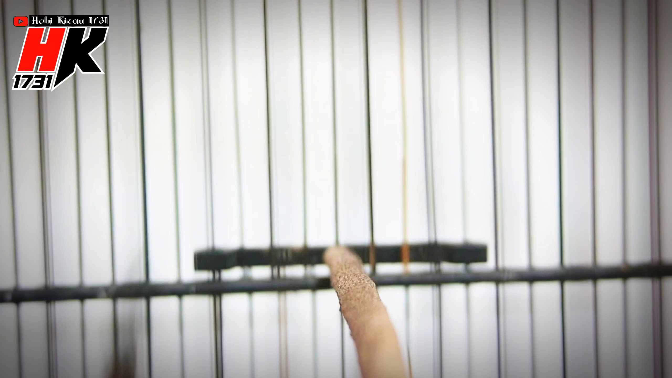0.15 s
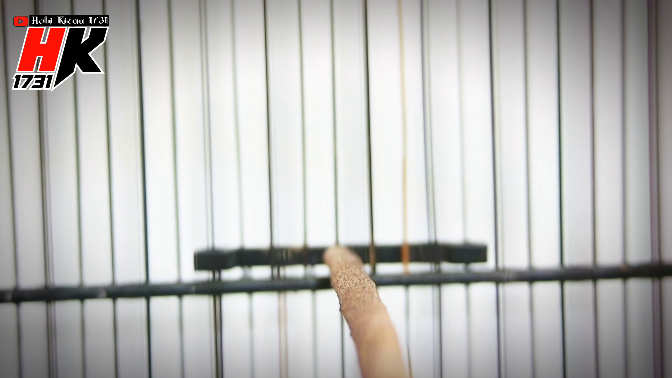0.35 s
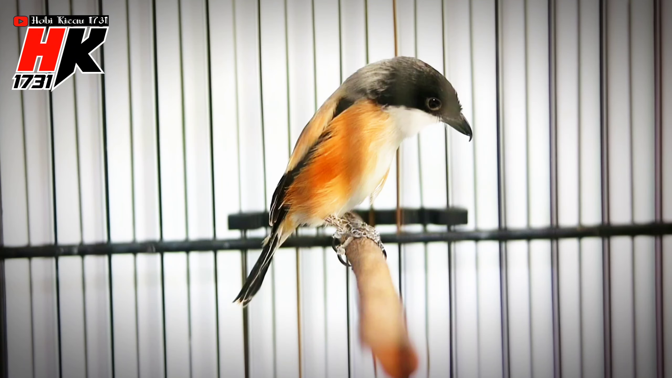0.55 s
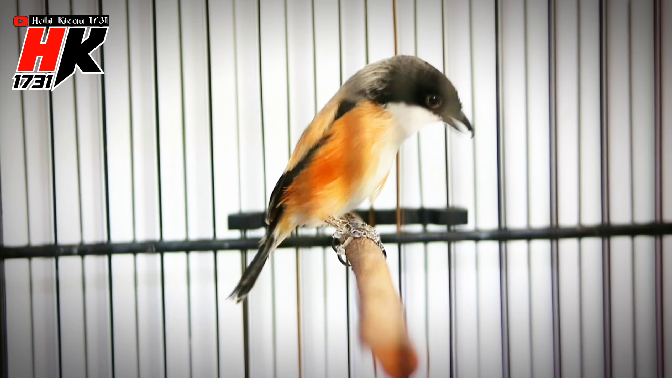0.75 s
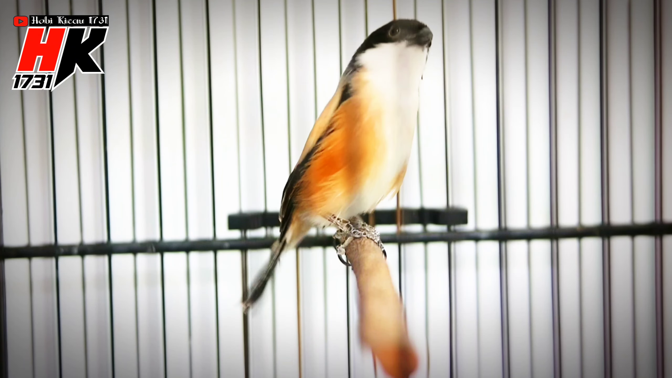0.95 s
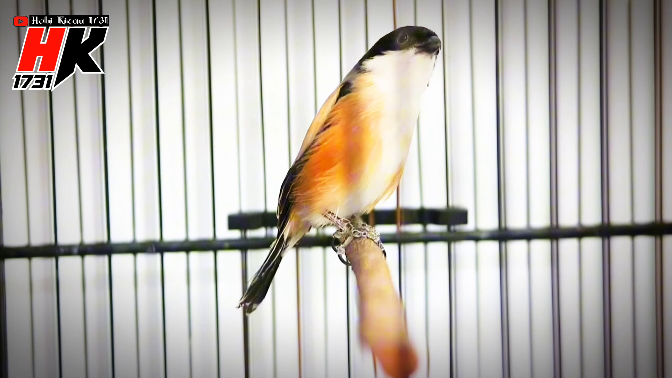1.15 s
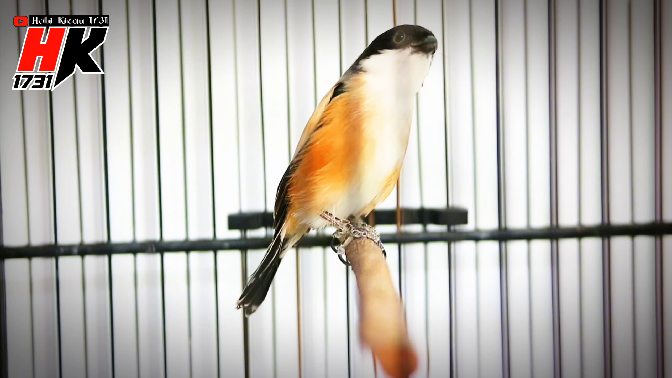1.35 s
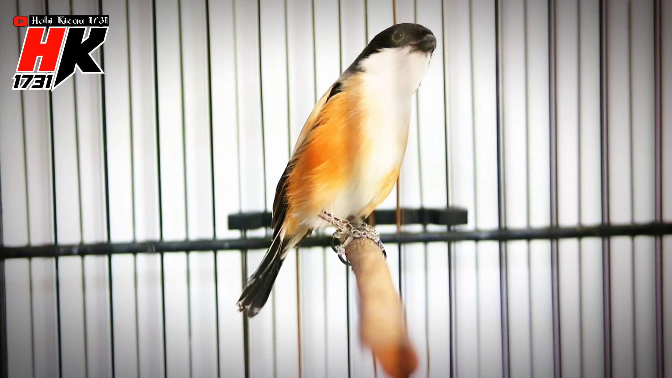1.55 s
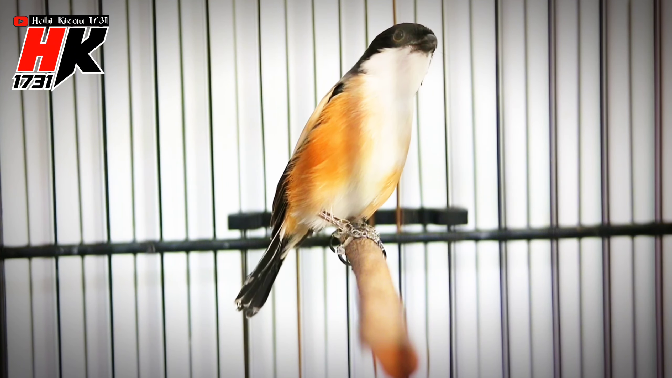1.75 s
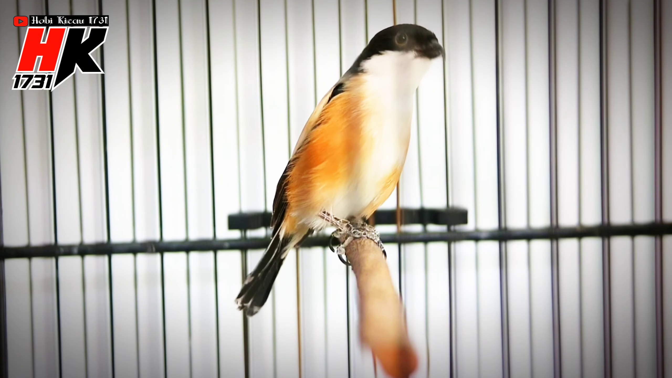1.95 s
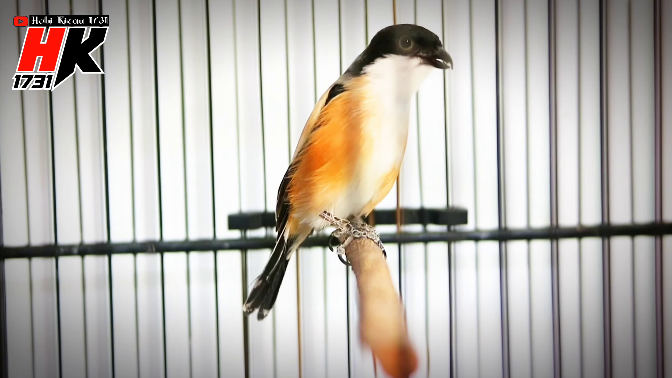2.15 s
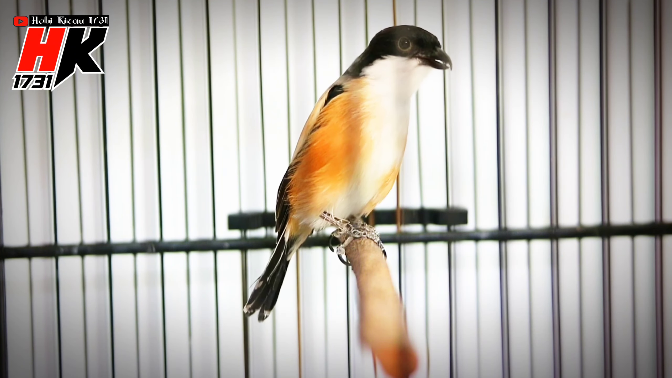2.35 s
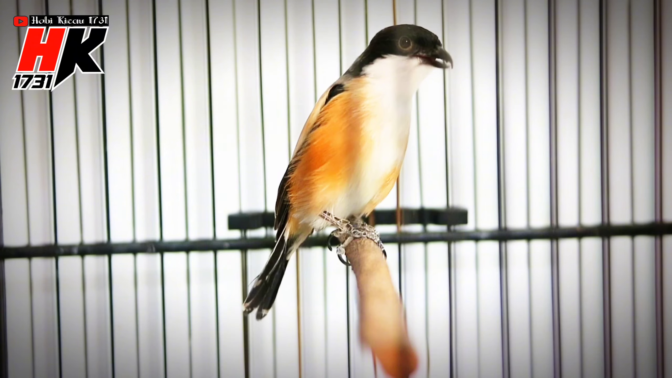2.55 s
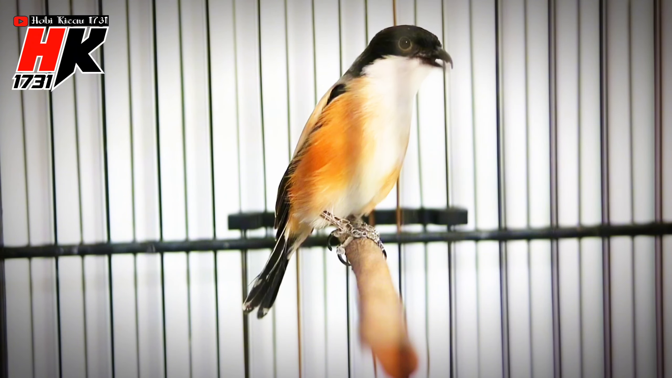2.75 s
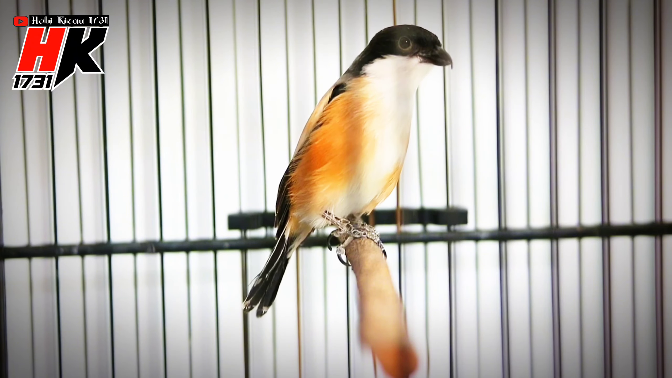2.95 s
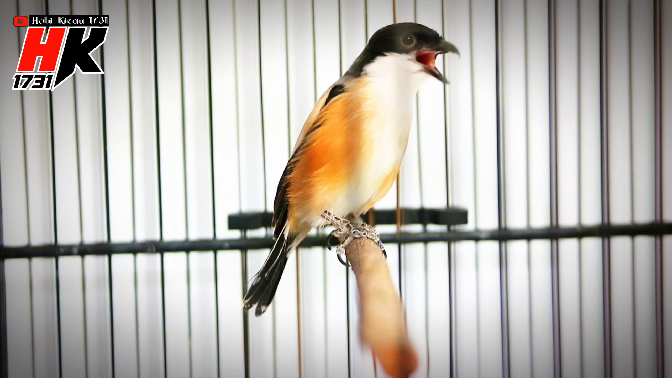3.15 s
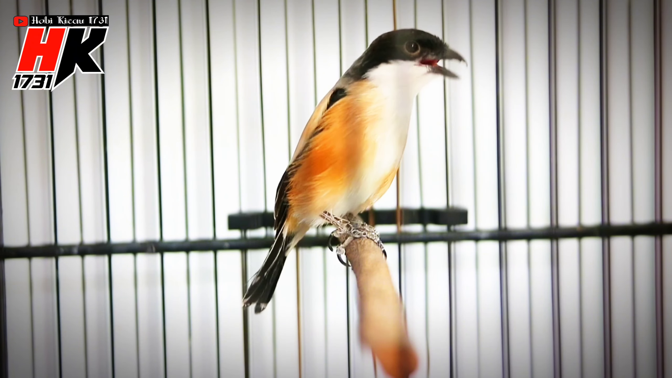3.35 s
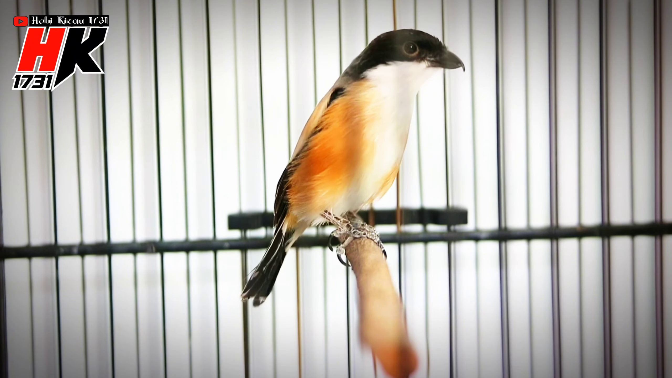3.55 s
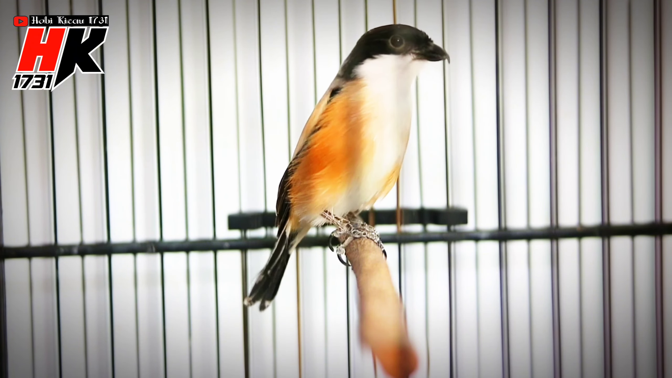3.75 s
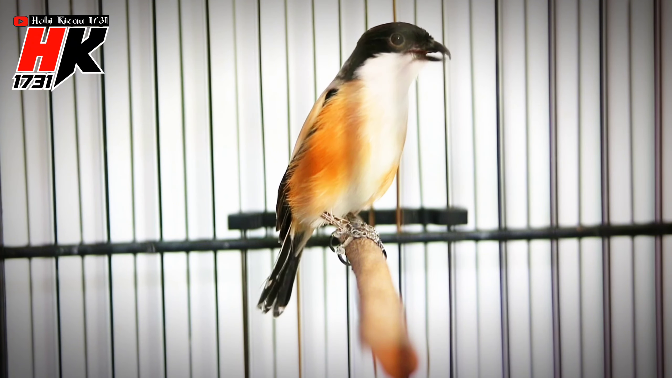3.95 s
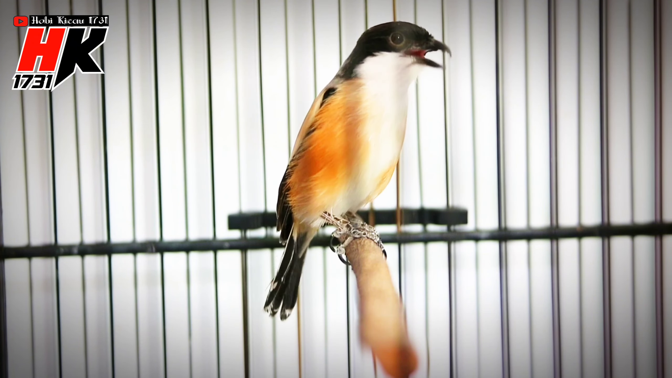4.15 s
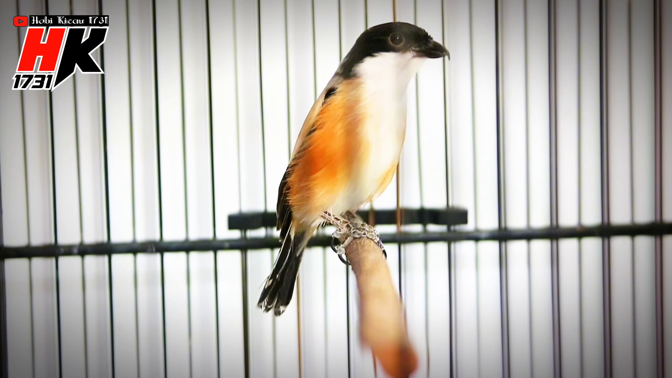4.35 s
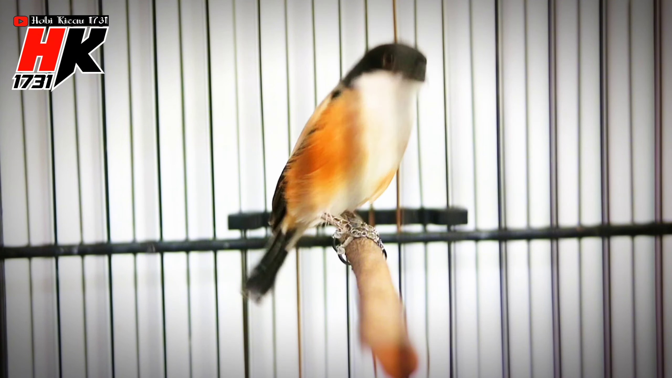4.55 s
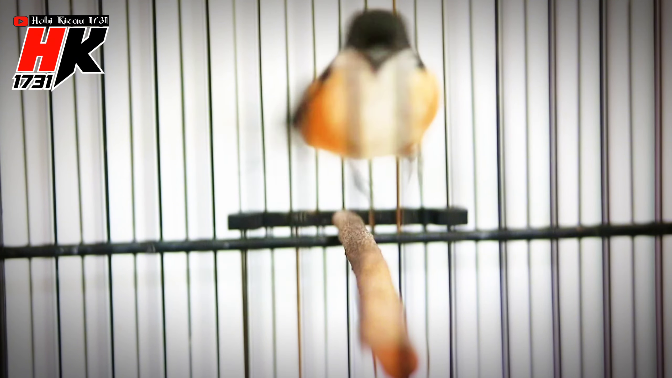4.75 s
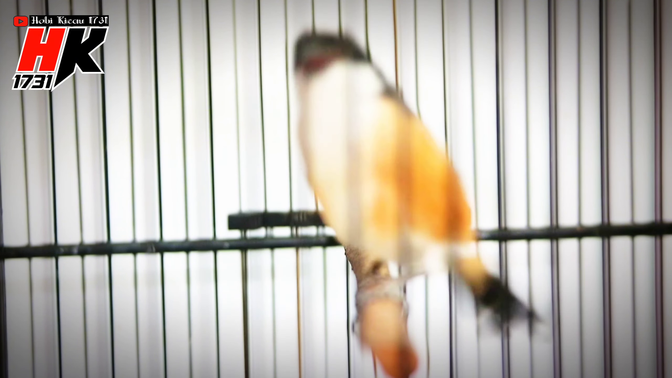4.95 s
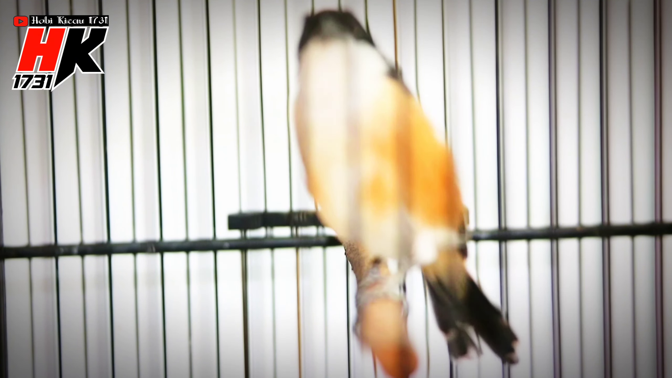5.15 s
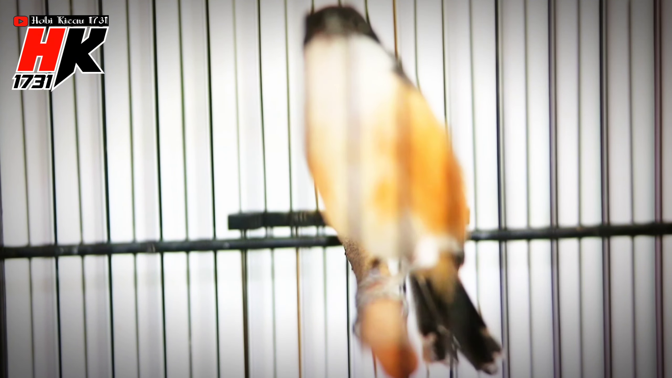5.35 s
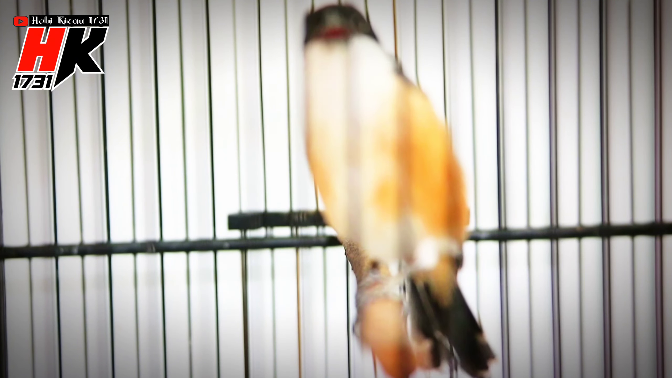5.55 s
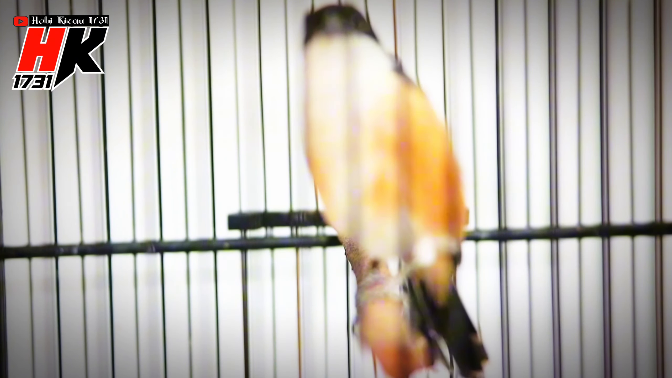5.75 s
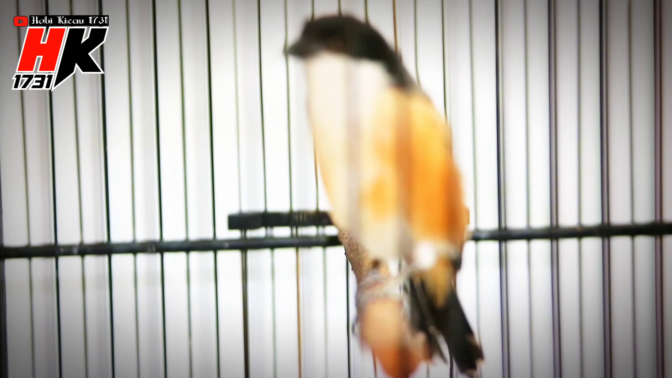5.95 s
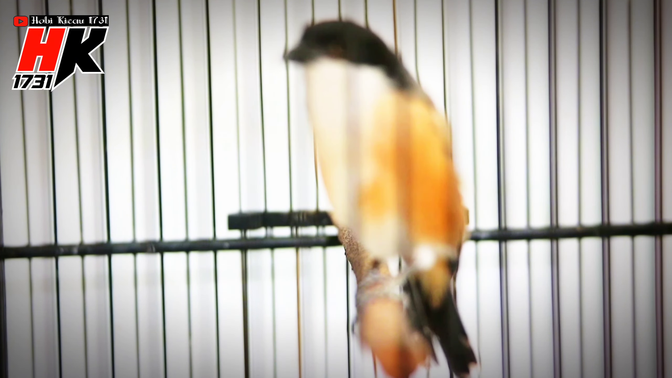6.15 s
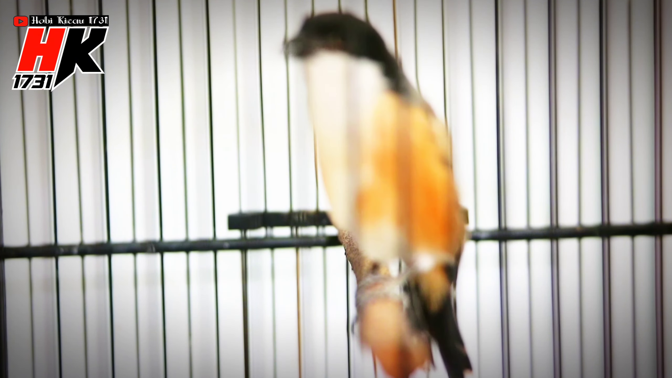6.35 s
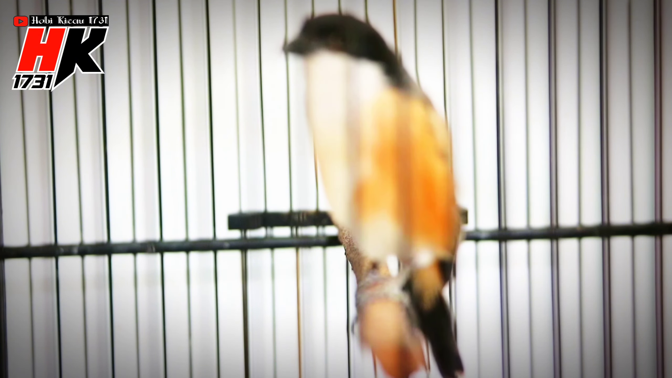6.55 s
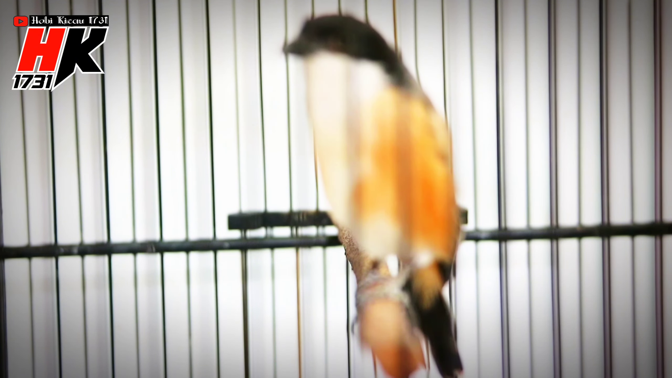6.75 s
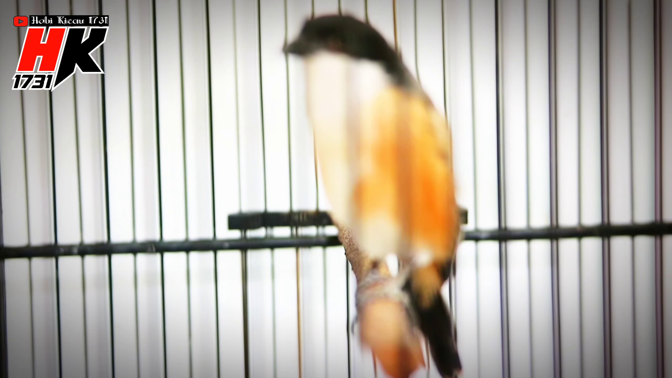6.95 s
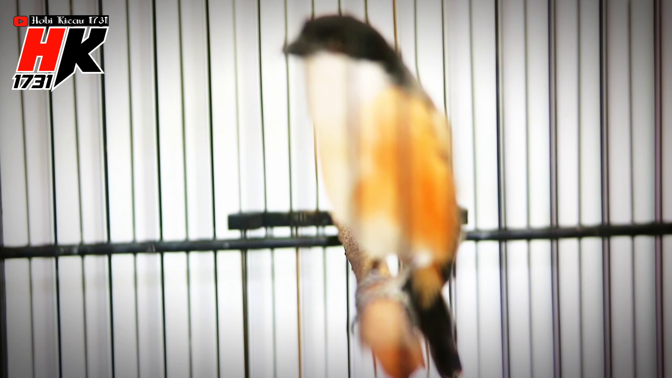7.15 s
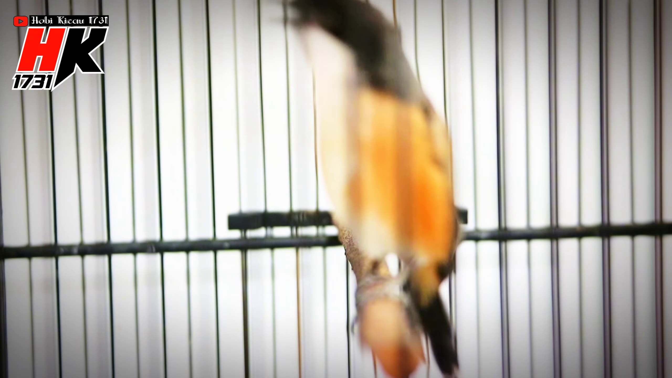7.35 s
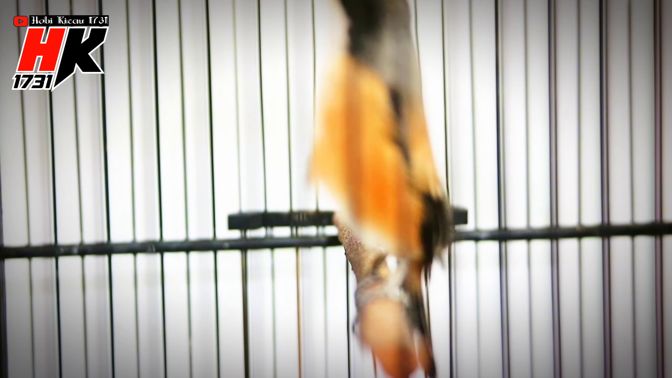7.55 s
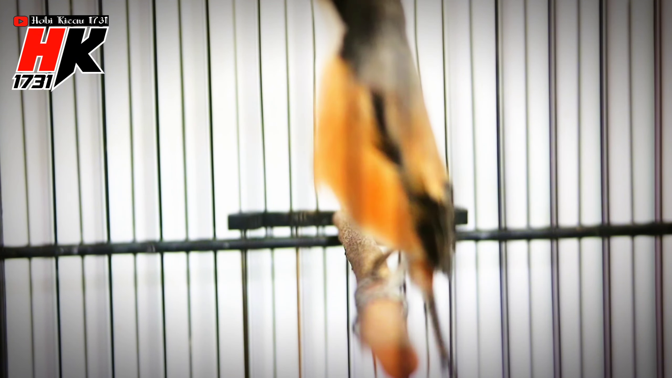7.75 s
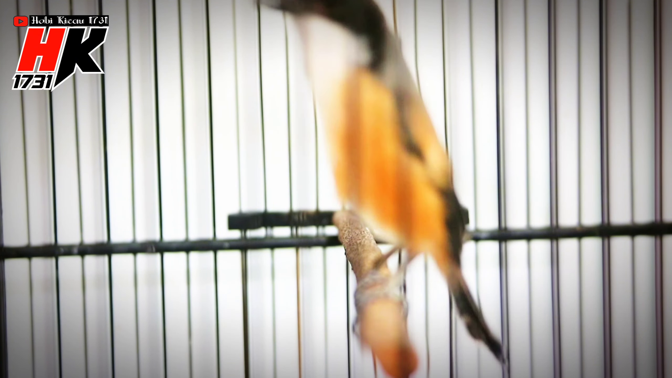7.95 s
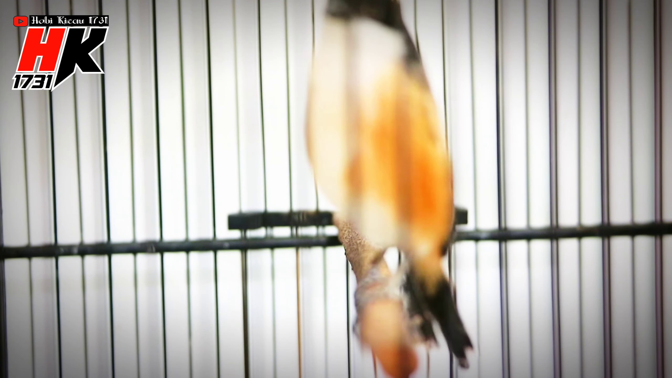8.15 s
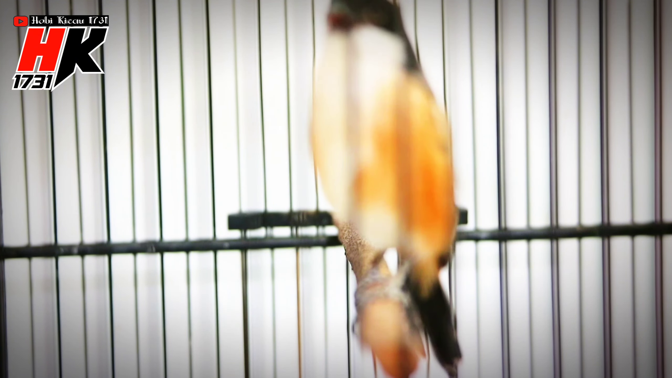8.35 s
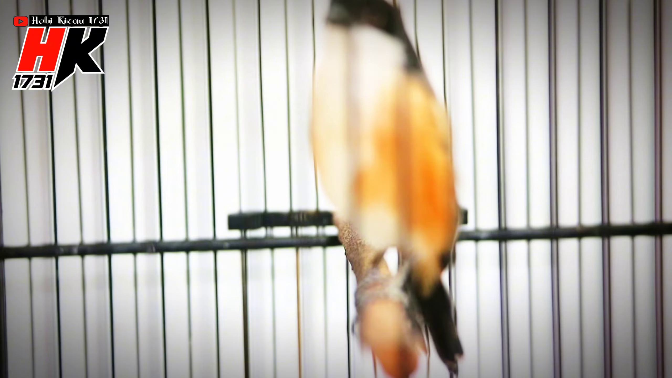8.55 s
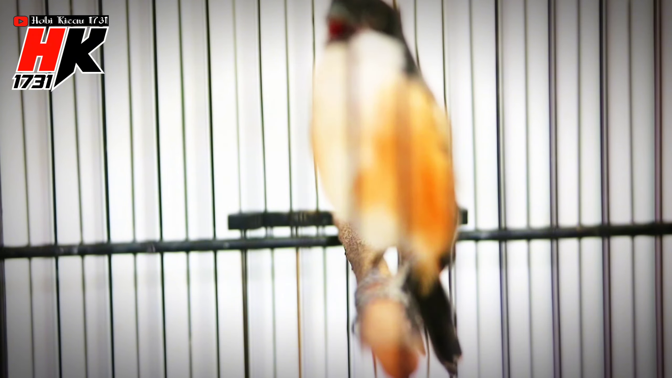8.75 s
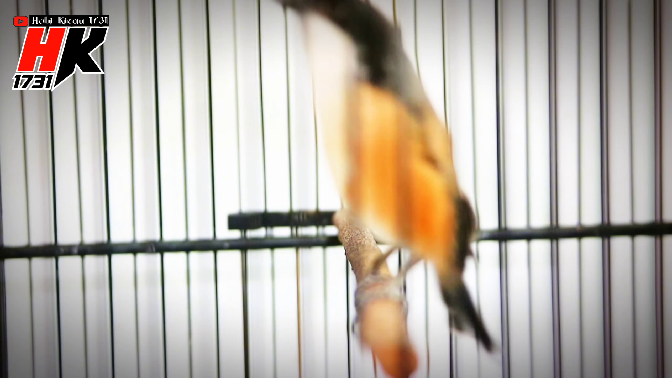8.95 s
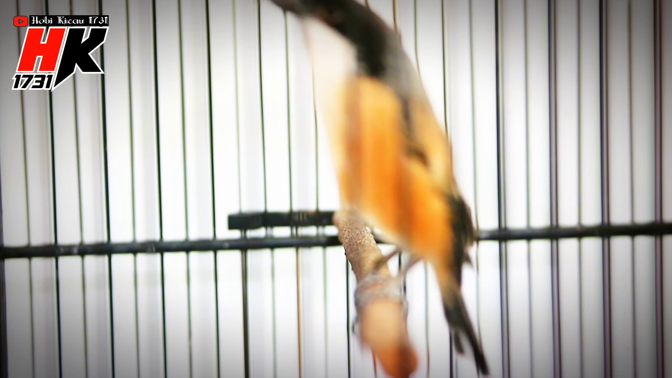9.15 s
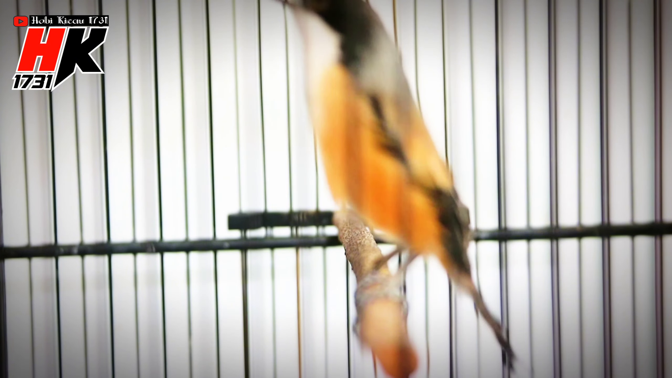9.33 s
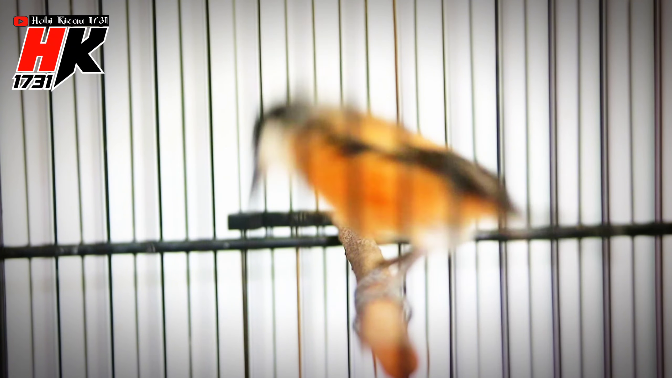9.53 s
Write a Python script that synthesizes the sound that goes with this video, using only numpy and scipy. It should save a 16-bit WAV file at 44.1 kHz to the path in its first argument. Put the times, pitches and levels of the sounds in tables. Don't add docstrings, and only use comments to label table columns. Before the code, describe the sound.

A shrike sings close to the microphones, slightly left, in a bare room with a bright half-second ring. At 0 s comes one short, slightly rough squeak. From about 0.46 to 0.85 s feathers rustle and wings slap bars and perch in four quick dry thumps. Loud clear chirps near 3.6 kHz begin at 0.84 s, about every 0.22 s, dropping to about 3.1 kHz from 1.7 to 2.9 s. A snarl at 3.15 s and two higher chirps follow; from 3.9 to 6.4 s harsh raspy chacks alternate with purer, lower chirps. In the pause, a faint distant call sounds at 6.8 s. From 7.3 s five long thin whistles leap up and sink gently, about two per second, with abrupt falling flicks and rough tails; the last, weaker whistle ends in scratchy notes, including a rising flick, around 9.6 s. Low fan hum ducks under calls and swells between them; peaks clip slightly.

```python
import sys
import numpy as np
from scipy import signal
from scipy.fft import rfft, irfft
from scipy.io import wavfile
from scipy.ndimage import uniform_filter1d, minimum_filter1d

SR = 44100
rng = np.random.default_rng(int(sys.argv[2]) if len(sys.argv) > 2 else 0)


def undo_db(level):
    steps = np.asarray(level, float) / 20
    return 10 ** steps


def inscribe(sig):
    pcm = np.round(np.clip(np.atleast_2d(sig).T, -1, 1) * 32767)
    wavfile.write(sys.argv[1], SR, pcm.astype(np.int16))


N = 427329


SQUEAK = [(0.004, .048, 3080, -4, -.06)]
SQUEAK_PARTIALS = [(1, -17), (2, -7.5), (3, -22.5), (4, -36)]
SQUEAK_BREAK = (0.37, 0.018, 0.3, 0.016, 0.52)
SQUEAK_BREATH = (0.029, 25, 4.3, 0.038, 9.8)


def squeak():
    notes = scooped(SQUEAK, SQUEAK_BREATH)
    return sing(notes, SQUEAK_PARTIALS, SQUEAK_BREAK, rasp_share=.05, breath=.002, droop=0.12)


# two near 3.7 kHz, two near 3.1 kHz
CHIRPS = [(.835, .078, 3714, -9.5, -0.0069), (1.052, 0.089, 3644, -10, -0.0013),
          (1.273, .082, 3714, -9, -0.082), (1.492, 0.075, 3512, -8, -0.055)]
HIGH_CHIRPS = [(3.428, .092, 3735, -9.5, -.035), (3.67, .11, 3761, -11, -0.084)]
LOW_CHIRPS = [(1.705, 0.1, 3249, -6.5, -0.06), (1.93, 0.089, 3119, -7.5, -0.028),
              (2.153, 0.082, 3118, -6.5, -.03), (2.375, 0.084, 3114, -7, -.03),
              (2.606, .095, 3052, -7, -.01), (2.831, 0.081, 3055, -7, -.01)]
HELD_CHIRPS = [(4.193, 0.093, 3102, -9.5, 0.0022), (4.737, 0.083, 3209, -10.5, -.022),
               (5.295, .115, 3097, -13.5, -0.0102), (5.885, 0.11, 3130, -12.5, -0.029)]
CHIRP_PARTIALS = [(0.499, -21), (0.751, -52), (1.001, -1), (1.25, -25.5), (1.499, -15.5), (2.003, -20),
                  (2.499, -28.5), (3.001, -36), (3.498, -36.5), (4.002, -56)]
LOW_PARTIALS = [(0.501, -16), (0.748, -23.5), (1.002, 1), (1.249, -20), (1.499, -17), (1.75, -37.5),
                (2.004, -27), (2.253, -28), (2.498, -31.5), (4.001, -38.5)]
HELD_PARTIALS = [(.5, -27.5), (1, -4.5), (1.26, -24.5), (1.499, -15), (2, -28), (2.502, -32.5), (3.5, -44),
                 (4, -40.5)]
CHIRP_BREAK = (.15, .012, .1, .045, .75)
HIGH_BREAK = (.1, .012, .07, .025, .6)
LOW_BREAK = (0.23, 0.016, 0.096, 0.061, 0.71)
HELD_BREAK = (0.04, 0.0062, 0.064, 0.029, 0.64)
CHIRP_BREATH = (.011, 16, 4.46, 0.018, 2.3)
LOW_BREATH = (.012, 16, 10, .03, 5)
HELD_BREATH = (.011, 12, 2.5, 0.005, 3.5)


def chirps():
    first = sing(scooped(CHIRPS, CHIRP_BREATH), CHIRP_PARTIALS, CHIRP_BREAK, breath=0.0083, droop=0.32)
    high = sing(scooped(HIGH_CHIRPS, CHIRP_BREATH), CHIRP_PARTIALS, HIGH_BREAK, breath=0.0021, droop=0.22)
    low = sing(scooped(LOW_CHIRPS, LOW_BREATH), LOW_PARTIALS, LOW_BREAK, breath=.03, droop=0.28)
    held_notes = scooped(HELD_CHIRPS, HELD_BREATH, settle_s=.07)
    held = sing(held_notes, HELD_PARTIALS, HELD_BREAK, breath=0.0026, droop=0.138)
    return first + high + low + held


CHACKS = [(3.93, 0.13, 3890, -12, -0.15), (4.467, 0.12, 3820, -11, -0.14), (5.01, 0.1, 4033, -9, -.16),
          (5.597, 0.11, 3910, -9.5, -.17), (6.288, 0.11, 4010, -9.5, -.17)]
SNARL = [(3.155, 0.11, 4094, -10, -0.089)]
CHACK_BREAK = (0.27, 0.035, 0.924, .01, 0.87)
SNARL_BREAK = (.08, .04, .72, .02, .8)
CHACK_BREATH = (.016, 15, 3.4, 0.057, 4.8)


def chacks():
    settle_s = .052
    notes = scooped(CHACKS, CHACK_BREATH, settle_s)
    harsh = sing(notes, CHIRP_PARTIALS, CHACK_BREAK, rasp_share=1.15, throat_hz=3900)
    snarl = scooped(SNARL, CHACK_BREATH, settle_s)
    return harsh + sing(snarl, CHIRP_PARTIALS, SNARL_BREAK, rasp_share=0.62)


WHISTLES = [(7.78, .178, 4110, -18.5, 3.2), (8.272, .17, 4052, -15.5, 3), (8.745, .182, 4040, -18, 6.2)]
FLAT_WHISTLES = [(7.31, .172, 3821, -16, 3.7), (9.322, .175, 3313, -24.5, 13.8)]
WHISTLE_PARTIALS = [(1, 2), (2, -21.5), (3, -33)]
WHISTLE_BREAK = (.65, .048, .04, .01, .1)


def whistles():
    notes = leaping(WHISTLES, 1.09) + leaping(FLAT_WHISTLES, 1.025)
    return sing(notes, WHISTLE_PARTIALS, WHISTLE_BREAK, breath=0.0019)


FLICKS = [(7.495, 0.032, 4500, 2085, -12), (7.968, 0.027, 4400, 2190, -8), (8.454, .026, 4300, 2252, -6),
          (8.93, .028, 4200, 2264, -8.5), (9.589, .024, 1800, 3624, -9.5)]
TAILS = [(7.525, .05, 2933, 2905, -11.5), (8.004, 0.036, 3657, 3394, -9.5), (8.485, 0.042, 3740, 3304, -14),
         (8.96, .04, 3300, 3706, -9.5), (9.54, .045, 2420, 2550, -22), (9.608, .032, 3660, 3940, -12.5),
         (9.478, .045, 3247, 3605, -12.5)]
FLICK_BREAK = (.7, .015, .6, .01, .7)
TAIL_BREAK = (.7, .015, .7, .02, .75)
FLICK_BREATH = (0.01, 10, .1, 0.015, 2.1)
TAIL_BREATH = (0.0091, 4.1, 2.5, 0.045, 6.2)


def flicks_and_tails():
    flicks = sing(gliding(FLICKS, FLICK_BREATH), WHISTLE_PARTIALS, FLICK_BREAK, breath=0.0067)
    tails = gliding(TAILS, TAIL_BREATH)
    return flicks + sing(tails, WHISTLE_PARTIALS, TAIL_BREAK, rasp_share=0.27, droop=.08)


def sing(notes, partials, breaks, rasp_share=0.13, breath=0.017, droop=0.0, throat_hz=None, trim_db=-3):
    out = np.zeros(N)
    onset, settle_s, body, end_s, end = breaks
    for note in notes:
        s, hz, db = np.transpose(note)
        first, last = round(s[0] * SR), min(round(s[-1] * SR), N)
        size = last - first
        t = np.arange(first, last) / SR
        turns = [s[0] + settle_s - .012, s[0] + settle_s, s[-1] - end_s, s[-1]]
        rough = np.clip(np.interp(t, turns, [onset, body, body, end]), 0, 1)
        slack = droop * np.clip(1 - (s[-1] - t) / end_s, 0, 1) ** 1.42
        pitch = np.interp(t, s, hz) * (1 - slack + .08 * rough * wander(350, size))
        phase, tone = 2 * np.pi * np.cumsum(pitch) / SR, 0
        for k, partial_db in partials:
            away = abs(k - 1)
            own_db = partial_db + min(away, 1) * 2.7 * rng.standard_normal() - 60 * away * slack
            tone = tone + undo_db(own_db) * np.sin(k * phase + 0.54 * away * wander(270, size))
        shake_db = 6.5 * rough * wander(220, size) + 2.5 * wander(35, size)
        tone = rms_one(tone) * undo_db(shake_db)
        share = np.clip(rasp_share * rough ** 2 + breath, 0, 1)
        edge = np.clip(np.minimum((t - s[0]) / 0.001, (s[-1] - t) / 0.012), 0, 1)
        stretch = np.clip((throat_hz or np.percentile(hz, 70)) / 3900, .7, 1.2)
        voice = np.sqrt(1 - share) * tone + np.sqrt(share) * rasp(size, stretch)
        out[first:last] += edge * undo_db(np.interp(t, s, db) + trim_db) * voice
    return out


# f/Hz, width/Hz, level/dB
THROAT = [(1750, 300, -18), (2850, 170, -2), (3350, 200, -14), (3950, 190, 0), (4500, 300, -13),
          (5800, 900, -26), (7300, 1200, -25), (11800, 2000, -43)]


def rasp(size, stretch):
    bunch_hz = 190 * (1 + .3 * wander(60, size))
    bunches = undo_db(4.0 * np.sin(2 * np.pi * np.cumsum(bunch_hz) / SR))
    pulses = rng.standard_normal(size) * (rng.random(size) < 7000 / SR) * bunches
    out = 0
    for k, (hz, width_hz, db) in enumerate(THROAT):
        mode = (hz * stretch, 2.2 * width_hz)
        out = out + undo_db(db) * (-1) ** k * resonate(resonate(pulses, *mode), *mode)
    return rms_one(out)


def breathe(start, length, db, breath, bends, swell_db=0):
    attack_s, under_db, sag_db, release_s, fade_db = breath
    turns = [0, attack_s, max(length - release_s, attack_s + .001), length]
    push = [0.71 * length, 0.74 * length]
    s = np.unique(np.concatenate([turns, push, np.transpose(bends)[0]]))
    level_db = np.interp(s, turns, [db - under_db, db, db - sag_db, db - sag_db - fade_db])
    level_db = level_db + np.interp(s, push, [0, swell_db])
    return np.transpose([start + s, np.interp(s, *np.transpose(bends)), level_db])


def scooped(rows, breath, settle_s=0.03524):
    hook = .045
    notes = []
    for s, length, hz, db, scoop in rows:
        bends = [(0, hz * (1 + scoop + hook)), (breath[0], hz * (1 + scoop)), (settle_s, hz)]
        notes.append(breathe(s, length, db, breath, bends))
    return notes


# t/s, multiple of the pitch
LEAP = [(0, .46), (.015, 1.24), (.031, 1.27)]
WHISTLE_BREATH = (0.034, 6.7, 0.079, .025, 38)


def leaping(rows, lands_at):
    notes = []
    for s, length, hz, db, swell_db in rows:
        path = LEAP + [(.043, lands_at), (.7 * length, 1), (length, 1.05)]
        bends = [(t, k * hz) for t, k in path]
        notes.append(breathe(s, length, db, WHISTLE_BREATH, bends, swell_db))
    return notes


def gliding(rows, breath):
    return [breathe(s, length, db, breath, [(0, from_hz), (length, to_hz)])
            for s, length, from_hz, to_hz, db in rows]


# t/s, level/dB
FACING = [(0.0, 1.3), (0.75, 3.5), (2.94, 4), (3.26, 2.3), (4.59, 3.4), (4.75, 4.5), (6.3, 3.4), (6.7, 9.2),
          (7.3, 4.5), (7.5, 6.4), (8.04, 4.3), (8.72, 4.1), (9.69, 3.5)]


def at_microphones(bird, wet):
    facing = np.sqrt(level(FACING))
    near = .6 * bird * [[1], [1]] + right_later([.2 * bird, .62 * bird], 0.0015194)
    return undo_db(1.0) * (near + wet) * [facing, 1 / facing]


# f/Hz, T60/s
ROOM_T60 = [(1400, 0.47), (2000, 0.51), (3000, 0.53), (5500, 0.48), (8000, 0.21), (11000, 0.68),
            (15000, 0.06)]


def room(x):
    t = np.arange(round(.9 * SR)) / SR
    noise = rng.standard_normal((2, 2, len(t)))
    echoes = sum(band * undo_db(-60 * t / at_hz(ROOM_T60, hz)) for hz, band in bands(noise, low_hz=352))
    echoes *= np.clip((t - .002) / 0.002, 0, 1)
    echoes /= np.sqrt(np.sum(echoes ** 2, axis=1, keepdims=True))
    return signal.fftconvolve(x[None], echoes, axes=1)[:, :N]


# t/s, peak level/dB
FLAPS = [(0.4872, -17.5), (0.611, -11.5), (0.731, -16.5), (0.846, -19)]
# f/Hz, level per Hz/dB
FLAP = [(120, -41), (200, -4.5), (476, -20), (1220, -15), (3730, -5), (4640, -2), (5360, -19), (6770, -10),
        (15000, -20.5)]
# t/s, level/dB
RUSTLE = [(0.462, -38.5), (0.528, -47), (0.648, -55), (0.838, -61.5), (0.87, -60)]


def wings():
    head = round(1.0 * SR)
    t, loud = np.arange(head) / SR, level(RUSTLE)[:head]
    for s, db in FLAPS:
        peak = s + .003
        loud = loud + undo_db(db - 4) * np.exp(np.where(t < peak, (t - peak) / .0025, (peak - t) / .003))
    noise = sum(undo_db(at_hz(FLAP, hz)) * band for hz, band in bands(rng.standard_normal((2, 2, head))))
    return np.pad(loud * rms_one(noise), ((0, 0), (0, N - head)))


FAR_CALL = [(6.825, .04, 2776, 2660, -30)]
FAR_PARTIALS = [(.73, -12), (1.001, -6), (2, -27)]
FAR_BREAK = (.6, .015, .8, .02, .9)
FAR_BREATH = (0.0076, 14, 14, 0.031, 20)


def far_call():
    notes = gliding(FAR_CALL, FAR_BREATH)
    return sing(notes, FAR_PARTIALS, FAR_BREAK, droop=.15, rasp_share=0.43, breath=0.063, trim_db=1.5)


# f/Hz, level per Hz/dB
AIR = [(15, -44), (25, -15), (187, 1.5), (331, -4), (397, -5), (665, -8), (1920, -13.5), (2550, -14),
       (6980, -33.5), (7540, -51), (8800, -46), (12000, -53), (15600, -79), (22000, -120)]
# f/Hz, width/Hz, level re air/dB
HUM = [(126, 29, -13), (200.3, 16, -10), (358.4, 12, -16), (472, 7.2, -16), (594, 2.6, -17),
       (712, 2.9, -15)]
# f/Hz, level/dB
BALANCE_DB = [(60, -5), (180, 8), (550, 10.5), (1650, 6.5), (4970, -0.5), (15000, -2.5)]
# f/Hz, correlation
LIKENESS = [(30, 0.7), (300, 0.78), (700, 0.1), (2000, 0.055), (15000, .05)]


def air():
    out = 0
    weak_bass = np.arange(N) < .46 * SR
    for hz, (mid, side) in bands(rng.standard_normal((2, 2, N)), high_hz=12000):
        alike, pan_db = np.clip(at_hz(LIKENESS, hz), -1, 1), at_hz(BALANCE_DB, hz) / 2
        pair = np.sqrt(1 + alike) * mid + np.sqrt(1 - alike) * side * [[1], [-1]]
        lumps_db = (3.0 if hz < 500 else 1.2) * swell(2.0) - 7 * (hz < 500) * weak_bass
        out = out + undo_db(at_hz(AIR, hz) + lumps_db) * pair * undo_db([[pan_db], [-pan_db]])
    out = rms_one(out)
    for hz, width_hz, db in HUM:
        line = rms_one(resonate(resonate(rng.standard_normal(N), hz, width_hz), hz, width_hz))
        out += undo_db(db + 2.2 * swell(1.5)) * line * undo_db([[3], [-3]])
    return undo_db(-38) * gain_ride() * right_later(out, 0.002166)


# t/s, level under full gain/dB
DUCKS = [(0.019, 12.5), (.87, 9), (1.1, 7), (1.32, 7), (1.53, 4.5), (1.74, 5), (1.962, 4.5), (2.18, 4.5),
         (2.4, 3), (2.64, 3), (2.86, 5), (3.2, 11.5), (3.48, 11.5), (3.75, 11), (3.99, 9.5), (4.25, 5.5),
         (4.5, 8), (4.79, 6.5), (5.06, 12), (5.64, 10), (6.321, 9.5), (7.53, 5), (7.99, 4.5), (8.47, 3),
         (8.98, 4.5), (9.599, 6.5)]


def gain_ride():
    recover_db_per_s, duck_s = 23, 0.065
    t = np.arange(N // 32 + 1) * 32 / SR
    each_db = [np.where(t < s, 0, db - recover_db_per_s * (t - s)) for s, db in DUCKS]
    down_db = np.max(each_db, axis=0).clip(0)
    gain = undo_db(-uniform_filter1d(down_db, size=max(round(duck_s * SR / 32), 1)))
    return np.repeat(gain, 32)[:N]


def right_later(pair, lag_s):
    return np.array([pair[0], np.interp(np.arange(N) - lag_s * SR, np.arange(N), pair[1])])


def resonate(x, hz, width_hz):
    r = np.exp(-np.pi * width_hz / SR)
    top = np.array([1, 0, -1]) * (1 - r * r) / 2
    return signal.lfilter(top, [1, -2 * r * np.cos(2 * np.pi * hz / SR), r * r], x)


def bands(x, low_hz=22, high_hz=16500):
    edges = low_hz * 2 ** np.arange(0, np.log2(high_hz / low_hz), .5)
    for k, (low, high) in enumerate(zip(edges, edges[1:])):
        sos = signal.butter(2, [low, high], "band", fs=SR, output="sos")
        yield np.sqrt(low * high), signal.sosfilt(sos, x[k % 2])


def wander(rate_hz, size=N):
    r, run_in = np.exp(-2 * np.pi * rate_hz / SR), min(size, 3000)
    noise = rng.standard_normal(size + run_in)
    return rms_one(signal.lfilter([1], [1, -2 * r, r * r], noise)[run_in:])


def swell(rate_hz):
    return np.repeat(wander(32 * rate_hz, size=N // 32 + 1), 32)[:N]


def rms_one(x):
    return x / np.sqrt(np.mean(x ** 2) + 1e-20)


def at_hz(points, hz):
    table = np.array(points)
    return np.interp(np.log(hz), np.log(table[:, 0]), table[:, 1])


def level(rows):
    s, db = np.transpose(rows)
    return undo_db(np.interp(np.arange(N) / SR, s, db, left=-200, right=-200))


def scene():
    bird = squeak() + chirps() + chacks() + whistles() + flicks_and_tails()
    flaps = wings()
    wet = room(undo_db(-5.5) * bird + far_call() + undo_db(-11) * flaps[0])
    return at_microphones(bird, wet) + flaps + air()


# f/Hz, level/dB
MICROPHONE = [(1000, -0.5), (8000, 2), (9300, -7.5), (10000, -18.5), (10800, -6), (12000, -3),
              (15500, -11.5)]


def microphone(dry):
    hz = np.maximum(np.arange(N // 2 + 1) * SR / N, 1)
    return irfft(rfft(dry) * undo_db(at_hz(MICROPHONE, hz)), N)


def top_cut(x):
    return signal.sosfilt(signal.butter(12, 15630, fs=SR, output="sos"), x)


def record(dry):
    heard = microphone(dry)
    room_left = np.minimum(1.01 / (np.abs(heard).max(axis=0) + 1e-9), 1)
    gain = uniform_filter1d(minimum_filter1d(room_left, size=89), size=45)
    low_pass = signal.cheby2(12, 70, 15890, fs=SR, output="sos")
    cut = signal.sosfilt(low_pass, np.clip(heard * gain, -1, 1))
    return top_cut(np.clip(1.139 * cut, -1, 1))


dry = scene()
out = record(dry)
inscribe(out)
```